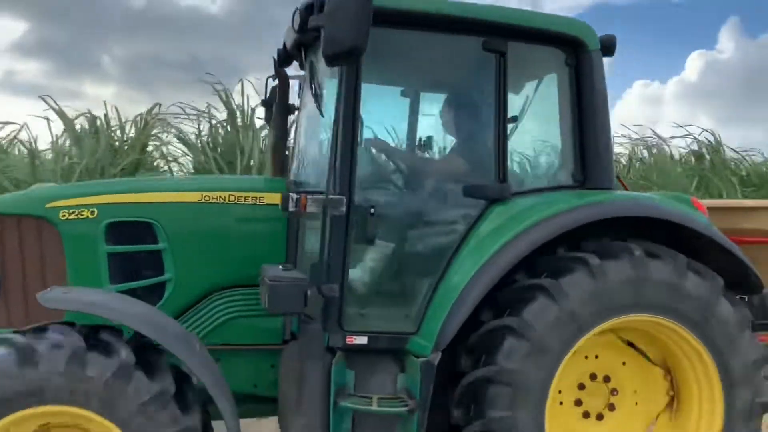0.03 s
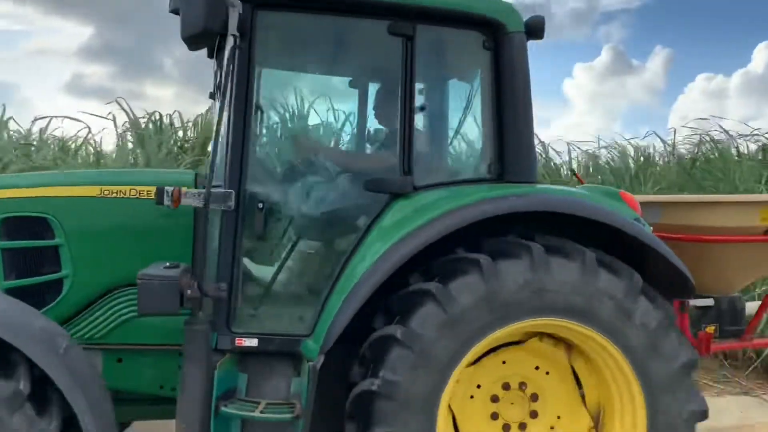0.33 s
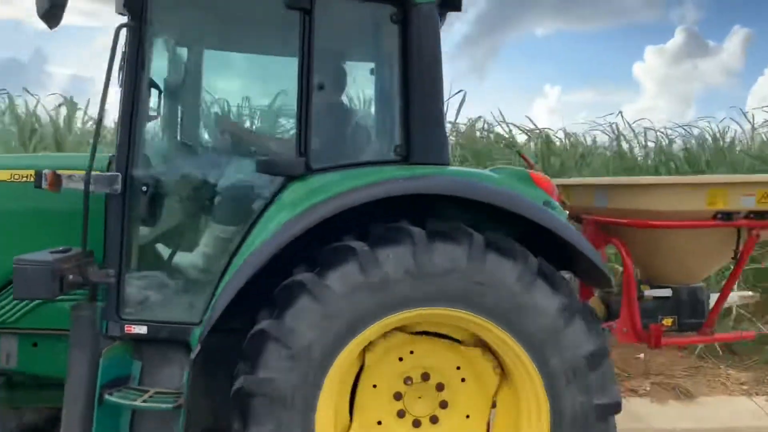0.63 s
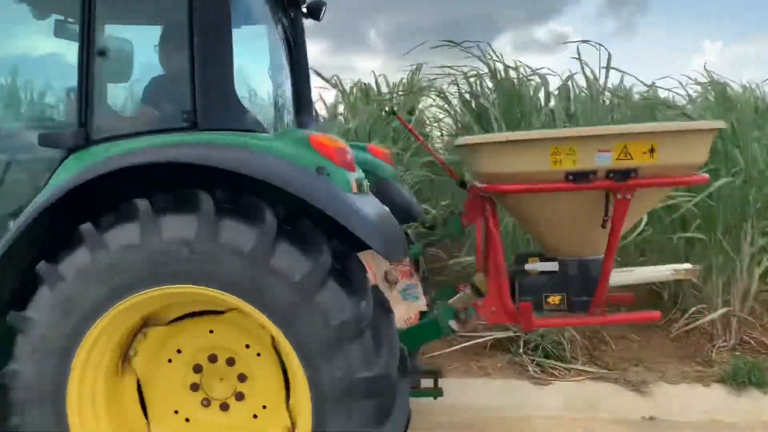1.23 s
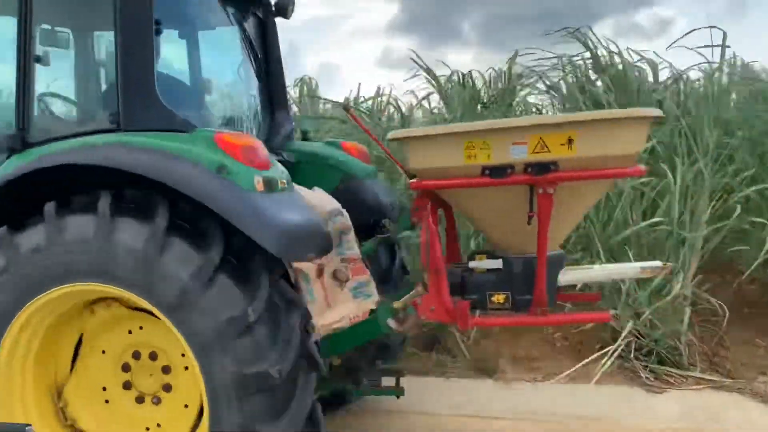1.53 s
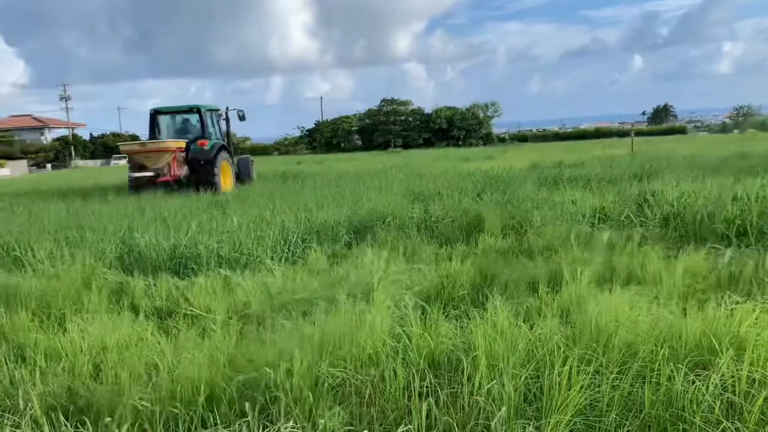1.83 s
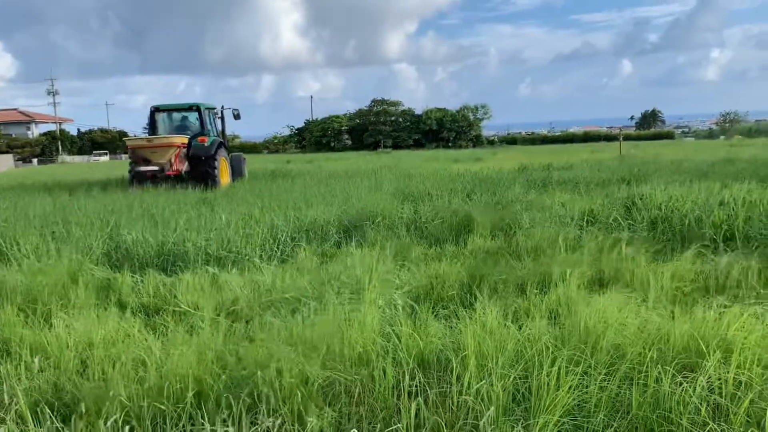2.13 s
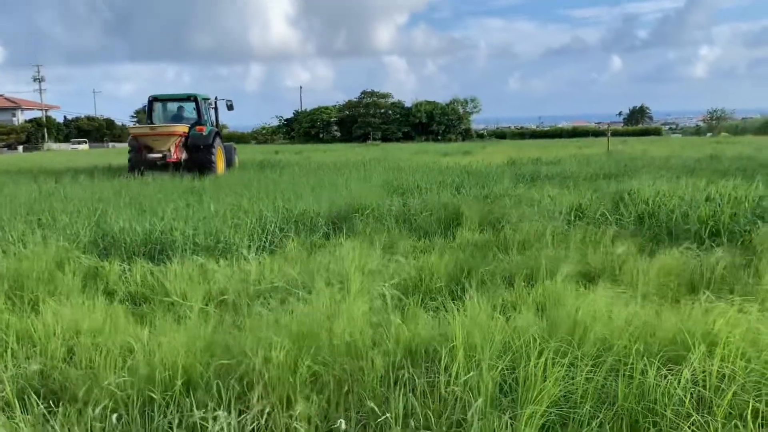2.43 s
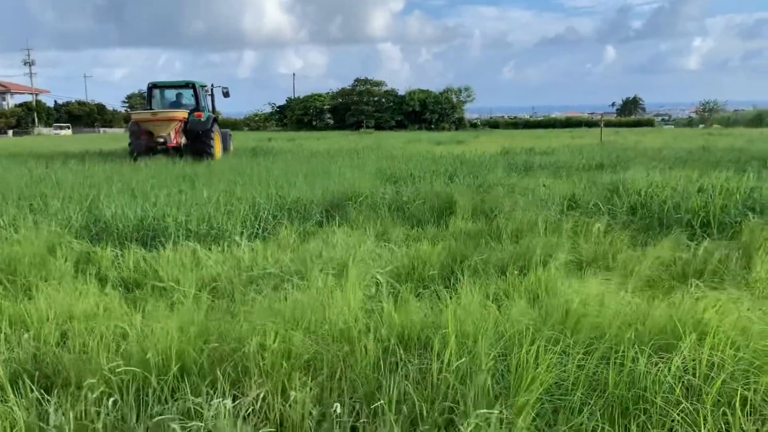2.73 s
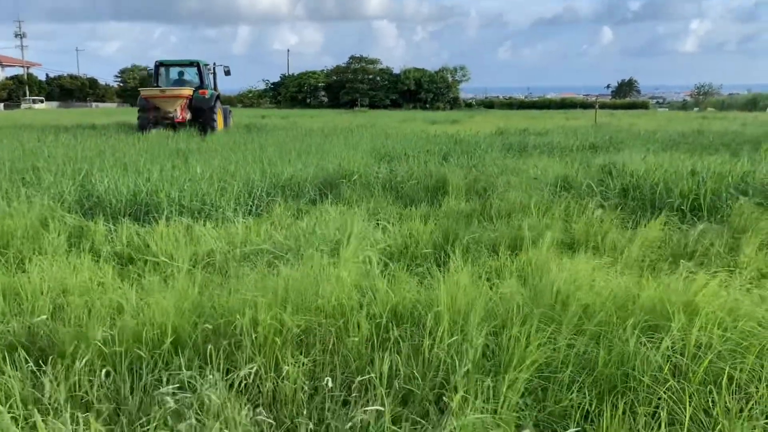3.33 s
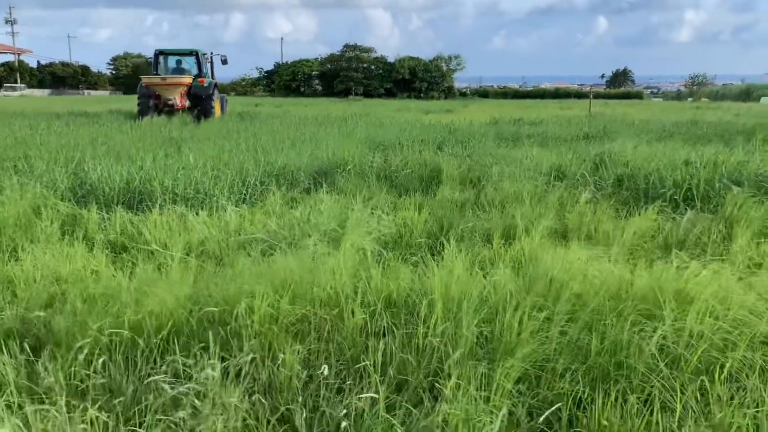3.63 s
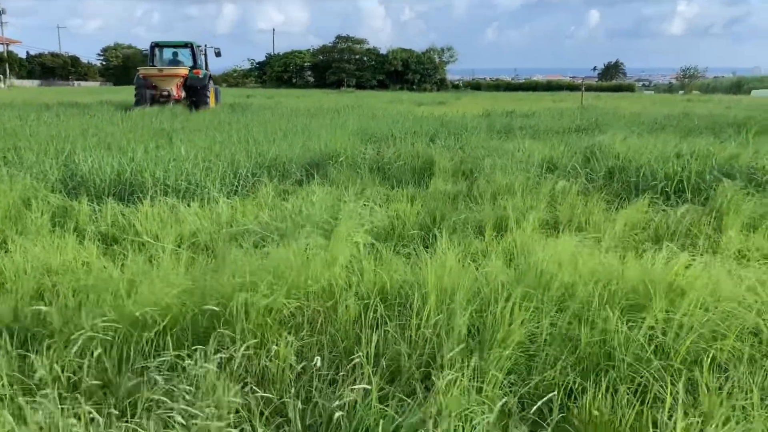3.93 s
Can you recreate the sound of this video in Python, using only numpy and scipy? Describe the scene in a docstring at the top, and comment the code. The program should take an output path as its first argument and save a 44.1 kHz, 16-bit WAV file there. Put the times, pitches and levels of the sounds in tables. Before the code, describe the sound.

Tractor engine clatters nearby, then hums distantly under rapid swishes of flung granules and wind.

```python
"""Tractor and pendulum spreader

A four-cylinder diesel tractor rolls past at arm's length, knocking and whining at low revs.
The scene cuts to a field: the tractor drones far off at working speed while its pendulum spreader
flings granules, one swish per swing of the spout. Wind rumbles and thumps on the microphone."""
import sys
import numpy as np
from scipy import signal
from scipy.fft import rfft, irfft
from scipy.io import wavfile
from scipy.ndimage import uniform_filter1d, map_coordinates

SR = 44100
rng = np.random.default_rng(int(sys.argv[2]) if len(sys.argv) > 2 else 0)


def persist_wave(psi):
    """Save psi, clipped to +-1, as 16-bit WAV."""
    counts = np.round(np.clip(psi, -1, 1) * 32767).astype(np.int16)
    wavfile.write(sys.argv[1], SR, np.atleast_2d(counts).T)


N = 176400
T = np.arange(N) / SR
CUT_S, CUT_FADE_S = 1.544, 0.0037
IDLE_FIRING_HZ, WORK_FIRING_HZ = 39.7, 77.6

# Noise spectra. Each row: frequency in Hz, relative spectral density in dB.
RUMBLE_SPECTRUM = [(20, -30), (35, -11), (50, -1.5), (80, 1), (130, -7.5), (200, -18), (350, -25.5),
                   (700, -57)]
EDDY_SPECTRUM = [(40, -7), (80, -3.5), (135, 4.5), (200, -3), (350, -12.5), (550, -25), (1000, -58)]
FAR_SPECTRUM = [(100, 9), (280, 5.5), (450, -6), (570, 2), (670, 2.5), (800, 0), (1000, -11), (1230, -0.5),
                (1600, -9), (2050, -8.5), (2500, -12.5), (3300, -19), (4500, -17), (6500, -18),
                (9000, -17.5), (10500, -19.5)]
THROW_SPECTRUM = [(800, -22), (1500, -11.5), (2100, -5), (2500, -5.5), (3300, -3.5), (3900, -2), (4550, 5),
                  (5100, 0), (5800, 1.5), (6600, -1), (7600, -0.5), (8800, 4.5), (9600, 4), (10500, -13.5)]
SPILL_SPECTRUM = [(1500, -31), (2500, -5), (3400, 8.5), (4000, -1.5), (4700, 3), (7000, -1.5), (8800, 6.5),
                  (10500, -2)]
BOOM_SPECTRUM = [(22, -28), (42, -9), (62, 4.5), (88, 2), (135, -2.5), (190, -10.5), (300, -22)]
BODY_SPECTRUM = [(110, -13), (200, 2.5), (300, 1.5), (380, -0.5), (460, -4), (535, 4), (600, -3),
                 (700, 0.5), (780, -5), (870, -6.5), (1110, -3), (1400, -15.5), (2000, -22)]
KNOCK_SPECTRUM = [(700, -14), (1110, 0), (1400, 0.5), (1750, -1.5), (2000, -1), (2400, -5.5), (3000, -8),
                  (3300, -9), (3650, -12), (4100, -10), (5200, -17.5), (10000, -26)]
HISS_SPECTRUM = [(2000, -37.5), (4000, -6.5), (5600, -4.5), (7000, -0.5), (8800, 1), (9700, 1),
                 (10500, -14)]

# Envelopes of single sources. Each row: time in seconds, level in dB.
WIND_LEVEL = [(1.5, -28.5), (1.9, -32.5), (2.2, -34), (2.58, -27.5), (2.8, -41), (3.05, -32), (3.2, -26.5),
              (3.55, -30), (3.8, -26.5), (4, -31)]
DRONE_LEVEL = [(1.55, -33.5), (1.7, -30.5), (2.3, -28), (2.5, -37.5), (2.8, -45), (3.1, -40), (3.7, -36),
               (4, -38)]
TRANSMISSION_LEVEL = [(0, -36.5), (.25, -34.5), (.45, -45), (1.05, -36), (1.25, -60), (1.44, -27.5),
                      (1.54, -38)]
EXHAUST_BOOM_LEVEL = [(0, -25.5), (.5, -26.5), (.85, -22), (1.08, -23.5), (1.21, -25), (1.35, -22.5),
                      (1.54, -33)]

# Wind buffets. Each row: centre in seconds, level in dB, half-width in seconds.
EDDIES = [(1.869, -26, 0.0093), (2.409, -24, 0.0086), (2.756, -27.5, 0.011), (3.189, -24.5, 0.02),
          (3.268, -21, 0.015), (3.406, -29.5, 0.043), (3.519, -20.5, 0.017), (3.557, -15.5, 0.0039),
          (3.615, -29, 0.021), (3.725, -22, 0.021), (3.8, -34, 0.063)]
# Distant machinery tones. Each row: frequency in Hz, level in dB before the fade.
FAR_TONES = [(585, -55.5), (662, -53), (722, -55.5), (1226, -56.5)]
# Swings of the spout. Each row: time in seconds, relative levels of throw and leading spill in dB.
SWINGS = [(1.547,-32.5,-42),(1.621,-26.5,-38),(1.703,-30.5,-37),(1.782,-28,-35.5),(1.862,-29,-37),(1.942,-27.5,-36),(2.024,-28.5,-37),(2.101,-25,-33),(2.179,-25,-34),(2.264,-29.5,-38.5),(2.341,-30,-38),(2.423,-28,-31),(2.498,-27.5,-33.5),(2.585,-34.5,-37.5),(2.662,-30.5,-42),(2.738,-25.5,-32),(2.819,-28,-39),(2.9,-28.5,-32.5),(2.978,-29,-39),(3.058,-29,-34),(3.136,-29,-40),(3.218,-34,-43),(3.297,-31,-41),(3.378,-34.5,-41),(3.458,-34.5,-48),(3.538,-32,-34),(3.617,-32,-49),(3.697,-31.5,-34.5),(3.775,-29,-38.5),(3.859,-31.5,-43),(3.935,-30,-41)]
# Tyre lugs striking the road. Each row: centre in seconds, envelope peak in dB.
LUG_STRIKES = [(.095, -13), (0.159, -14), (0.653, -13), (0.721, -16), (0.755, -19), (0.835, -13),
               (1.058, -15.5), (1.134, -18.5), (1.406, -9), (1.464, -13)]
# Modes of the linkage. Each row: frequency in Hz, relative level in dB.
LINKAGE_MODES = [(1146, -16), (1230, -26), (980, -31)]
# Impacts of loose metal. Each row: start in seconds, relative level in dB, pitch in Hz.
METAL_STRIKES = [(0.051, -28, 3170), (.278, -27, 3120), (.482, -29.5, 3400), (.68, -28.5, 2850)]
# Modes of that metal. Each row: ratio to the pitch, relative level in dB.
METAL_MODES = [(1, -1.5), (.86, -5.5), (0.58, 0), (1.29, -9)]
# Gear and pump tones. Each row: frequency in Hz, levels in dB as the bonnet and as the rear pass.
GEAR_TONES = [(89.7, -34, -32), (415.8, -34, -43), (519, -45, -43), (1090, -39, -44)]
# Exhaust harmonics. Each row: multiple of the firing rate, level in dB.
EXHAUST_ORDERS = [(1, -34), (2, -31.5), (3, -31.5), (5, -41.5)]
# Uneven combustion. Each entry: relative strength of one cylinder in dB.
CYLINDER_BALANCE = [0.84, -0.41, -1.4, 1]
# The passing engine. Each row: time in seconds, relative levels of body, knock and hiss in dB.
PASS_LEVELS = [(0, -23.5, -31, -40.5), (.3, -24, -32.5, -40), (.68, -23, -33.5, -42.5),
               (.95, -26, -35.5, -41.5), (1.2, -28.5, -38, -43.5), (1.54, -28.5, -38.5, -44.5)]


def undb(db):
    """Amplitude grows tenfold with every 20 dB."""
    return 10 ** (np.asarray(db) / 20)


def unit(x):
    """Normalisation to an rms of 1."""
    return x / np.sqrt(np.mean(x ** 2))


def curve(table, column=1):
    """A gain envelope, interpolated in decibels from one column of a table."""
    rows = np.array(table)
    return undb(np.interp(T, rows[:, 0], rows[:, column]))


def colour(x, spectrum):
    """Filtering multiplies spectra; the response rolls off beyond the table's ends. The rms is 1."""
    hz, db = np.array(spectrum).T
    f = np.maximum(np.arange(N // 2 + 1) * SR / N, 1)
    gain = undb(np.interp(np.log(f), np.log(hz), db))
    roll_off = np.sqrt((1 + (hz[0] / f / 2) ** 4) * (1 + (f / hz[-1]) ** 8))
    return unit(irfft(rfft(x) * gain / roll_off, N))


def drift(rate_hz):
    """Noise averaged twice becomes a slow fluctuation of rms 1."""
    width = int(SR / rate_hz)
    smoothed = uniform_filter1d(rng.standard_normal(N), width, mode="wrap")
    return unit(uniform_filter1d(smoothed, width, mode="wrap"))


def grains(spread_db):
    """Tiny impacts of log-normal size, in three independent streams: direct, left and right scatter."""
    size = np.repeat(rng.standard_normal((3, N // 16 + 1)), 16, axis=1)[:, :N]
    return unit(rng.standard_normal((3, N)) * undb(spread_db * size))


def pan(db):
    """A level difference between the channels gives direction; positive is left."""
    return undb(np.array([[db], [-db]]) / 2)


def stereo(streams, coherence, pan_db=0, lag_s=0):
    """Partial coherence: the channels share the direct sound, lagged on the right, but not the scatter."""
    direct = np.array([streams[0], np.roll(streams[0], int(round(lag_s * SR)))])
    return (np.sqrt(coherence) * direct + np.sqrt(1 - coherence) * streams[1:]) * pan(pan_db)


def tone(hz, waver, flutter_db):
    """A rotating part gives a sinusoid, randomly modulated in frequency and level; the rms is 1."""
    phase = 2 * np.pi * np.cumsum(hz * (1 + waver * drift(9.14))) / SR
    return unit(np.sin(phase) * undb(flutter_db * drift(12)))


def shell(x, depth_db, spacing_hz, hold_s, turn_rad):
    """A shell's response depends on where it is struck: resonances and right-channel phase wander."""
    hz, at, bins = signal.stft(x, SR, nperseg=512, noverlap=384)
    place = np.meshgrid(hz / spacing_hz, at / hold_s, indexing="ij")
    fields = rng.standard_normal((2, 256, 256))
    ripple, phase = (map_coordinates(field, place, order=1, mode="mirror") for field in fields)
    rotation = np.array([np.ones_like(phase), np.exp(1j * turn_rad * phase)])
    bins = bins * undb(depth_db * ripple) * rotation
    return unit(signal.istft(bins, SR, nperseg=512, noverlap=384)[1][:, :N])


def wind():
    """Turbulent pressure on the microphone makes a low rumble, and single eddies thump."""
    rumble = curve(WIND_LEVEL) * colour(stereo(grains(0.75), coherence=0.81), RUMBLE_SPECTRUM)
    eddy_power = sum(undb(db) ** 2 * np.exp(-((T - at) / width) ** 2) for at, db, width in EDDIES)
    swirl = colour(stereo(grains(3.4), coherence=0.65), EDDY_SPECTRUM)
    running_rms = np.sqrt(uniform_filter1d(np.mean(swirl ** 2, axis=0), SR // 50))
    return rumble + np.sqrt(eddy_power) * swirl / running_rms


def far_tractor():
    """The exhaust drones at the firing rate, while machinery wash and whine fade with distance."""
    drone = curve(DRONE_LEVEL) * tone(WORK_FIRING_HZ, waver=0.0077, flutter_db=1.3)
    throb = 1 + 0.12 * np.cos(2 * np.pi * WORK_FIRING_HZ * T)
    machinery = stereo(grains(2.7) * throb, coherence=0.58, pan_db=1.8, lag_s=0.00002)
    wash = undb(-36.5) * colour(machinery, FAR_SPECTRUM)
    whine = sum(undb(db) * tone(hz, waver=0.005, flutter_db=2.5) for hz, db in FAR_TONES)
    receding = undb(-1.72 * (T - CUT_S))
    return drone + (wash + whine * pan(2.5)) * receding


def swell(age, rise_s, fall_s):
    """The power of a batch of granules has a Gaussian rise and an exponential decay."""
    return np.exp(-np.where(age < 0, (age / rise_s) ** 2, age / fall_s))


def spreader(spill_lead_s=0.017, scatter_s=0.048):
    """Incoherent impacts add in power: a few granules hit the spout, then the load rushes out."""
    throw_power, spill_power = np.zeros(N), np.zeros(N)
    for at, throw_db, spill_db in SWINGS:
        age = T - at
        rush = swell(age, rise_s=0.006, fall_s=0.0053)
        scatter = undb(-20.5) ** 2 * np.exp(-abs(age) / scatter_s) * (age > 0)
        throw_power += undb(throw_db) ** 2 * (rush + scatter)
        spill_power += undb(spill_db) ** 2 * swell(age + spill_lead_s, rise_s=0.003, fall_s=0.004)
    throw = colour(stereo(grains(2.9), coherence=0.59, pan_db=1), THROW_SPECTRUM)
    throw = shell(throw, depth_db=4, spacing_hz=207.5, hold_s=0.06, turn_rad=0.7)
    throw *= undb(1.05 * drift(25))
    spill = colour(stereo(grains(1.6), coherence=0.85, pan_db=-0.2), SPILL_SPECTRUM)
    spill = shell(spill, depth_db=2, spacing_hz=297, hold_s=0.053, turn_rad=0.8)
    return undb(0.5) * np.sqrt(throw_power) * throw + undb(-0.5) * np.sqrt(spill_power) * spill


def tyres(hz=112, width_s=0.0065):
    """Each lug that lands hard radiates a low thud, a sinusoid under a Gaussian envelope."""
    return sum(undb(db) * np.exp(-((T - at) / width_s) ** 2) * np.sin(2 * np.pi * hz * (T - at))
               for at, db in LUG_STRIKES)


def clank(start_s=1.058, attack_s=0.0056, decay_s=0.013):
    """One impact excites the damped modes of the linkage as the rear wheel goes by."""
    age = np.maximum(T - start_s, 0)
    modes = sum(undb(db) * np.sin(2 * np.pi * hz * age) for hz, db in LINKAGE_MODES)
    return modes * (1 - np.exp(-age / attack_s)) * np.exp(-age / decay_s)


def ticks(decay_s=0.0066):
    """Loose metal on the engine is struck and rings briefly in inharmonic modes."""
    out = np.zeros(N)
    for at, strike_db, hz in METAL_STRIKES:
        age = np.maximum(T - at, 0)
        modes = sum(undb(db) * np.sin(2 * np.pi * hz * ratio * age) for ratio, db in METAL_MODES)
        out += undb(strike_db) * modes * np.exp(-age / decay_s)
    return out


def gear_whine(burst):
    """Rotating gears and pumps radiate tones; the firings modulate the transmission's amplitude."""
    passed = np.minimum(T / CUT_S, 1)
    gears = sum(undb(front + (rear - front) * passed) * tone(hz, waver=0.00579, flutter_db=-0.5)
                for hz, front, rear in GEAR_TONES)
    transmission = curve(TRANSMISSION_LEVEL) * tone(551.8, waver=0.01103, flutter_db=2)
    return gears + transmission * unit(burst + 1.9)


def exhaust():
    """Periodic exhaust pulses sound at harmonics of the firing rate."""
    return sum(undb(db) * tone(order * IDLE_FIRING_HZ, waver=0.0024, flutter_db=-1)
               for order, db in EXHAUST_ORDERS)


def firings(first_s=0.003, attack_s=0.002, decay_s=0.011, scatter_db=1.5):
    """Impulsive excitation: one burst envelope per combustion, each cylinder with its own strength."""
    count = (T - first_s) * IDLE_FIRING_HZ + 1
    index = count.astype(int)
    age = count % 1 / IDLE_FIRING_HZ
    cylinder_db = np.array(CYLINDER_BALANCE)[index % len(CYLINDER_BALANCE)]
    size = undb(cylinder_db + scatter_db * rng.standard_normal(N)[index])
    return unit(size * (1 - np.exp(-age / attack_s)) * np.exp(-age / decay_s))


def clatter(spread_db, repeat):
    """Metal impacts are partly periodic: a share of their power recurs with each four-stroke cycle."""
    period = int(len(CYLINDER_BALANCE) * SR / IDLE_FIRING_HZ)
    periodic = unit(grains(spread_db)[:, np.arange(N) % period])
    return np.sqrt(repeat) * periodic + np.sqrt(1 - repeat) * grains(spread_db)


def engine(burst):
    """Forced vibration: with each firing the exhaust booms, the body shakes and the block knocks."""
    boom = stereo(clatter(0.49, repeat=0.11), coherence=0.71, pan_db=0.1)
    boom = colour(boom, BOOM_SPECTRUM) * curve(EXHAUST_BOOM_LEVEL) * unit(burst + 3)
    body = stereo(clatter(2.5, repeat=0.3), coherence=0.79, pan_db=4, lag_s=0.00024)
    body = colour(body * (burst + 3), BODY_SPECTRUM) * curve(PASS_LEVELS, column=1)
    knock = stereo(clatter(3.2, repeat=0.29), coherence=0.53, pan_db=1.5, lag_s=0.0001)
    knock = colour(knock * (burst + 2.4), KNOCK_SPECTRUM)
    knock = shell(knock, depth_db=3, spacing_hz=90.7, hold_s=0.04, turn_rad=1.45)
    knock *= curve(PASS_LEVELS, column=2)
    hiss = stereo(clatter(2.9, repeat=0.22), coherence=0.47, pan_db=0.5)
    hiss = colour(hiss * (burst + 2.14), HISS_SPECTRUM) * curve(PASS_LEVELS, column=3)
    return boom + undb(1) * body + undb(4.5) * knock + undb(2) * hiss


def near_tractor():
    """The sources of the passing tractor superpose, with whine and struck metal towards the left."""
    burst = firings()
    return engine(burst) + exhaust() + tyres() + (gear_whine(burst) + clank() + ticks()) * pan(6)


def scene():
    """A very short crossfade is heard as a cut from the roadside to the field."""
    field = np.clip((T - CUT_S) / CUT_FADE_S + 0.5, 0, 1)
    return (1 - field) * near_tractor() + field * (far_tractor() + spreader() + wind())


def record(dry):
    """An elliptic low-pass filter limits the bandwidth steeply above 10150 Hz."""
    return signal.sosfilt(signal.ellip(10, 0.2, 80, 10150, fs=SR, output="sos"), dry)


dry = scene()
out = record(dry)
persist_wave(out)
```